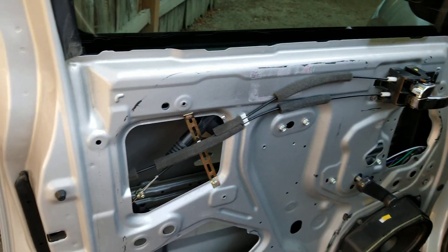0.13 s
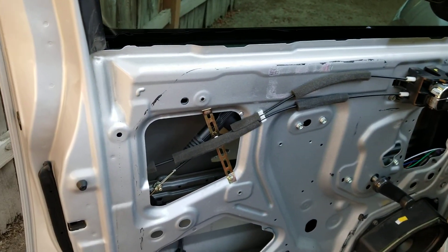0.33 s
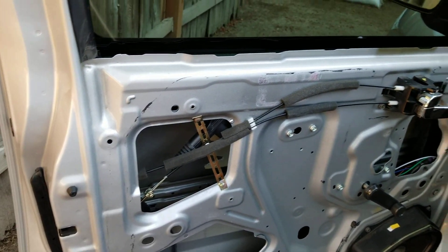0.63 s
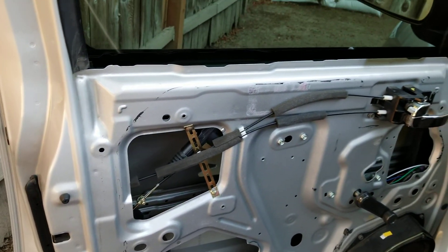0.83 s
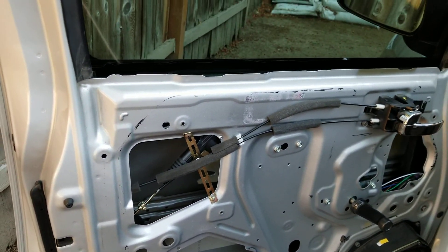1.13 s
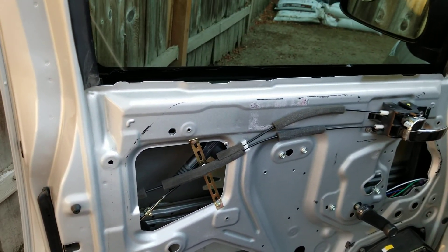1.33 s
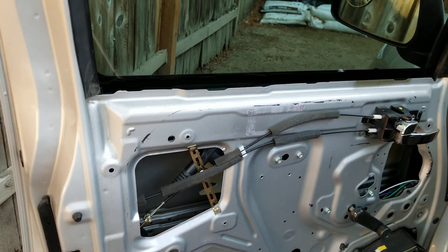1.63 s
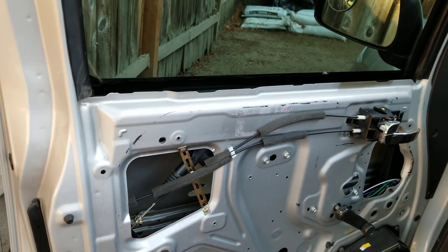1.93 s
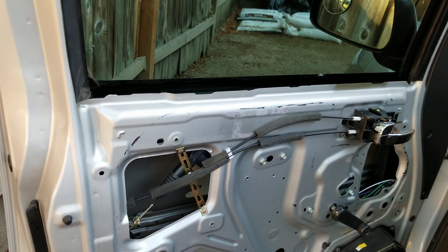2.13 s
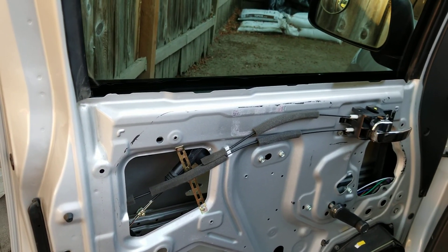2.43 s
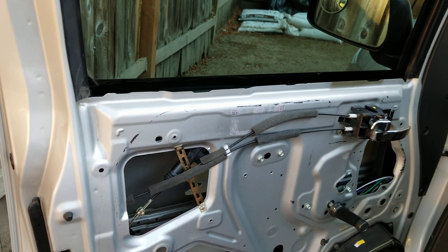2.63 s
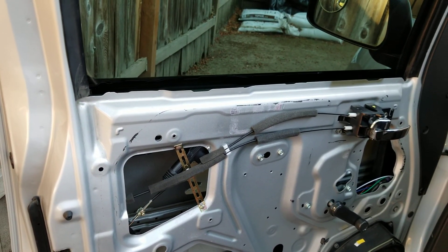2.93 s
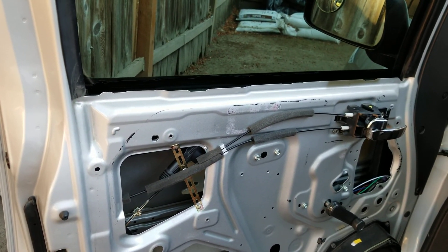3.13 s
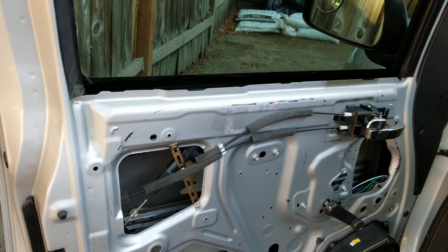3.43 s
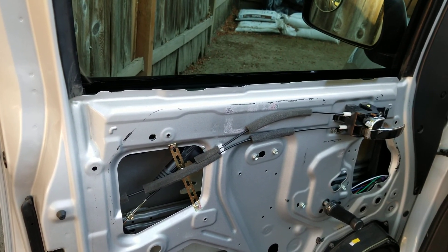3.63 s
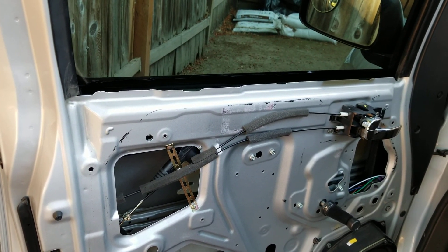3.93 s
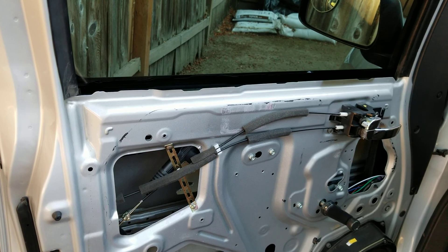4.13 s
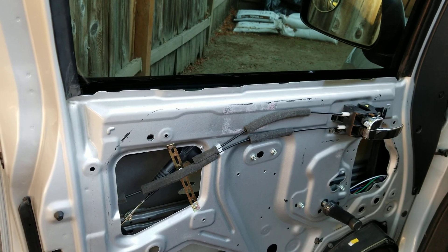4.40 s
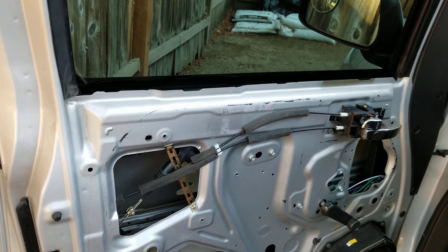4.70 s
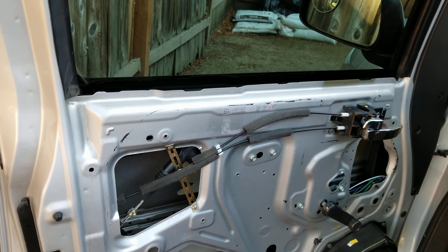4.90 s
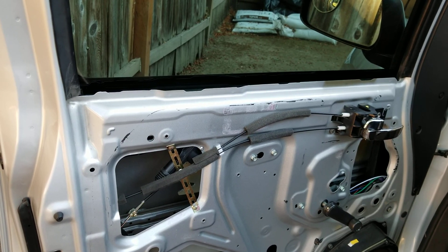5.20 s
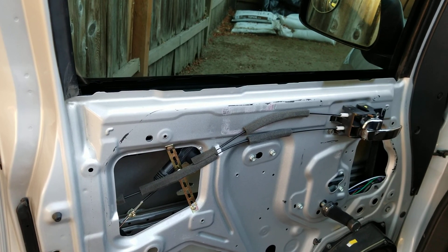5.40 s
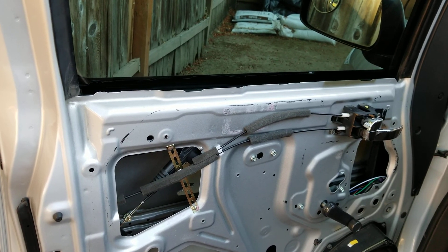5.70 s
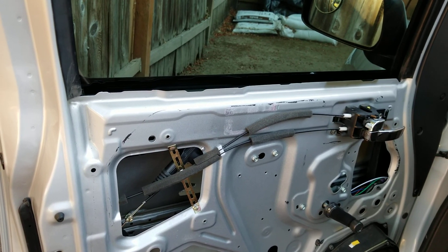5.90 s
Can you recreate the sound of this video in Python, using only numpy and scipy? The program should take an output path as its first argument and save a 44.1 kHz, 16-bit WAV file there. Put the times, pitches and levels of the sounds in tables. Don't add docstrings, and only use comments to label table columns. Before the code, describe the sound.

In a fenced yard, a close stereo microphone catches an electric door lock working in an open sheet-metal panel. After a second of low traffic rumble comes a tick and muffled stall knock. Lock and unlock strokes then alternate, each a sharp double metallic clack with short panel resonance, announced by a plastic tick and answered by a quieter, duller return. Faint birds and high insects stay behind.

```python
import sys
import numpy as np
from scipy import signal
from scipy.fft import rfft, irfft
from scipy.io import wavfile

SR = 44100
rng = np.random.default_rng(int(sys.argv[2]) if len(sys.argv) > 2 else 0)


def store_wav(level_fs):
    pcm = np.round(np.clip(np.atleast_2d(level_fs), -1, 1) * 32767)
    wavfile.write(sys.argv[1], SR, pcm.T.astype(np.int16))


def nominal_scale(level):
    x = np.asarray(level, float) / 20
    return 10 ** x


N = 266893

# [t/s, strength/dB]
LOCK_BLOWS = [
    (2.385, 0.5),
    (4.502, 0),
]
UNLOCK_BLOWS = [
    (3.455, 0.3),
    (5.553, 0.52),
]
LOCK_RETURN_BLOWS = [
    (2.787, 0.081),
    (4.906, 0.51),
]
UNLOCK_RETURN_BLOWS = [
    (1.702, 1.5),
    (3.856, 1.56),
    (5.955, 0.18),
]
STALL_BLOWS = [
    (1.272, -.6),
]
# panel thump/dB, brightness/dB, door sway of the blows/dB
LOCK_RUN, LOCK_COLOUR = (-.0405, .0005, -39, -20), (1, 3, 7)
UNLOCK_RUN, UNLOCK_COLOUR = (-.0375, .002, -37, -25.5), (.5, 4.5, 4)
LOCK_RETURN_RUN, LOCK_RETURN_COLOUR = (-.018, .018, -44, -38.5), (5, 1, 0)
UNLOCK_RETURN_RUN, UNLOCK_RETURN_COLOUR = (-.015, .008, -47, -40), (1, -1.5, -3)
STALL_RUN, STALL_COLOUR = (-.006, .0005, -29, -31.5), (4, 4, 15)
# [t/s from the main blow, level/dB, panel thump/dB, latch ring/dB, brightness/dB]
LOCK_HITS = [
    (-.0055, -36.5, 6, 3, -3.5),
    (0, -21.5, -4.5, 9, 0.5),
    (.01, -29.5, -3.5, 1.5, -6),
    (.014, -21, 2, -0.5, -13.5),
    (.025, -28, -2, -3, -12),
]
UNLOCK_HITS = [
    (0, -25, -16, 7.56, 8.5),
    (0.0126, -22.5, 2, 3.3, 1),
    (.022, -37, 3, 6.1, -14),
    (.033, -43, 5, 0.076, 0),
]
LOCK_RETURN_HITS = [
    (0, -35.5, 7, -5.5, 3),
    (.005, -38, 3, -18, -13.5),
    (.016, -47, 12, -6, 7.5),
    (.022, -41.5, 5, 1, -1),
    (.037, -50, -13, 3, -18),
]
UNLOCK_RETURN_HITS = [
    (0, -39.5, 2.7, -15, -1),
    (.007, -42.5, 4.2, 2, -15),
    (0.0134, -45, 3, -13, -19),
]
STALL_HITS = [
    (0, -48, 3.3, 5, 21),
    (0.012, -35, 5.1, -1, -15),
    (.04, -43.5, 6.4, -7, -11),
    (0.075, -50, 6.3, -3, -8),
    (.104, -56, 13, 2, -10),
    (.132, -52.5, 12, -2, -9),
]
STROKE_KINDS = [(LOCK_BLOWS, LOCK_RUN, LOCK_COLOUR, LOCK_HITS),
                (UNLOCK_BLOWS, UNLOCK_RUN, UNLOCK_COLOUR, UNLOCK_HITS),
                (LOCK_RETURN_BLOWS, LOCK_RETURN_RUN, LOCK_RETURN_COLOUR, LOCK_RETURN_HITS),
                (UNLOCK_RETURN_BLOWS, UNLOCK_RETURN_RUN, UNLOCK_RETURN_COLOUR, UNLOCK_RETURN_HITS),
                (STALL_BLOWS, STALL_RUN, STALL_COLOUR, STALL_HITS)]
# [start t/s, end t/s, start level/dB,
# end level/dB, brightness/dB]
LOOSE_RATTLES = [
    (0.878, 0.914, -79, -74, 12.5),
    (1.334, 1.438, -59.5, -69, 7.5),
]
RUB_THUMP_DB, TOUCH_SPREAD_DB = -16, 1.5
SETTLE_DB_PER_S, BRIGHT_SETTLE_DB_PER_S = 880, 1151
# [f/Hz, level/dB per Hz]
DOOR_SPECTRUM = [(36, -44.5), (60, -7.5), (120, -4), (230, -3), (420, -9.5), (600, -11), (900, -7.5),
                 (1500, -15), (2200, -15), (6500, -24), (9000, -34.5), (13500, -30), (15850, -34.5),
                 (16250, -61.5)]
# [f/Hz, T60/s]
DOOR_DECAY = [(50, 0.18), (120, 0.49), (300, 0.28), (800, 0.17), (2000, 0.12), (6000, 0.1), (15000, 0.016)]
# [f/Hz, level/dB, T60/s]
PANEL_MODES = [(54.93, -16, 0.51), (91, -14, 0.47), (126, -19.5, 0.38), (164.8, -8.5, 0.15),
               (202, -21, .12), (271.7, -15.5, 0.2), (367, -14.5, 0.14), (421, -10.5, 0.074),
               (510, -22, 0.022), (714, -21.5, 0.041), (749, -13, 0.21), (917.4, -5.5, 0.057),
               (1045, -26, 0.15), (1280, -20, 0.05), (1406, -8.5, 0.078), (1530, -5, 0.079),
               (1710, -16, 0.077), (1771, -21.5, 0.026), (2420, -27.5, 0.087), (2496, -20, .1)]
# [f/Hz, left over right/dB]
DOOR_BALANCE = [(60, -0.5), (120, 0.5), (240, 3), (480, 3.5), (950, 5.5), (1890, 5.5), (3770, 5.5),
                (7520, 13.5), (15000, 12)]
# [f/Hz, left-right likeness/1]
DOOR_LIKENESS = [(60, 0.92), (250, 1), (1000, 0.29), (2500, 0.064), (6000, 0.3), (15000, 0.092)]
DOOR_TOP_HZ = 16250
# [t/s, level/dB, rebound/dB, tail/dB, pan/dB]
SWITCH_TICKS = [
    (1.1239, -29, -16.5, -7, 1),
    (2.203, -32.5, -3, -6, 7),
    (3.2745, -32, -16, -2, 3.5),
    (4.32, -32.5, -13.5, -4, 2),
    (5.3727, -35, -4, 2, 6.5),
]
# [f/Hz, level/dB per Hz]
TICK_SPECTRUM = [(410, -43), (700, -5), (1900, -7), (2660, -11), (3250, -10), (3810, -2.5), (5040, -7),
                 (6850, -10), (7620, -1), (8590, -18), (9560, -21.5), (10100, -9), (11200, -11.5),
                 (15300, -2.5), (17000, -7)]
# [t/s, f/Hz, level/dB, T60/s]
SPRING_TWANGS = [
    (3.456, 2503, -53.5, 0.56),
    (3.855, 3600, -68.5, 0.8),
    (3.858, 4740, -66, 0.82),
    (3.856, 5020, -66, 1.1),
    (3.859, 6820, -69.5, 0.78),
    (5.554, 2570, -56, 0.61),
    (1.703, 1530, -41, 0.18),
]
TWANG_WIDTH_HZ = 130
YARD_T60_S, YARD_DB = 0.34, -22.5
# [t/s, level/dB]
ROAD_LEVEL = [(0.0, -52.5), (0.3, -52), (1.45, -52), (1.92, -55), (2.49, -52.5), (3.22, -55), (3.54, -53.5),
              (4.31, -55.5), (4.73, -50.5), (4.99, -50), (5.09, -54), (6.05, -56.5)]
# [f/Hz, level/dB per Hz]
RUMBLE_SPECTRUM = [(15, -64.5), (25, -24), (39, -10.5), (59, -3.5), (76, -2.5), (92, 3), (125, -4.5),
                   (156, -23.5), (198, -12), (250, -28.5), (320, -50.5), (550, -120)]
# [f/Hz, level/dB per Hz]
TRAFFIC_SPECTRUM = [(88, -45), (150, -3.5), (220, -9.5), (255, -1), (349, -4), (753, -11.5), (872, -5),
                    (1190, -15), (1630, -27.5), (2220, -20.5), (2670, -26.5), (5760, -33.5), (6550, -24.5),
                    (9110, -40), (12000, -29), (15600, -54.5), (22000, -120)]
TRAFFIC_UNDER_DB, TRAFFIC_FOLLOWS, TRAFFIC_FADE_DB_PER_S = -10, 0.69, -0.59
# [t/s, f/Hz, level/dB]
WHINE_TRACK = [
    (0, 467, -85),
    (.15, 460, -68),
    (.4, 412, -73.5),
    (0.749, 385, -63.5),
    (1.1, 394.4, -74.5),
    (1.6, 380, -90),
    (6.05, 370, -110),
]
# [f/Hz, left over right/dB]
AIR_BALANCE = [(60, 2.5), (130, 4.5), (290, 10), (640, 5.0), (1410, 8.5), (3100, -2), (6820, 13),
               (15000, 7.5)]
# [f/Hz, left-right likeness/1]
AIR_LIKENESS = [(60, 0.98), (180, 0.99), (550, 1), (1650, -0.46), (4970, 0.39), (15000, 0.04)]
# [f/Hz, level/dB per Hz]
CHORUS_SPECTRUM = [(9000, -40), (10500, -10.5), (12500, 1), (14000, -0.5), (15700, 4.5), (15950, -39),
                   (16500, -70.5)]
# [t/s, length/s]
SINGER_PAUSES = [(0.122, .06), (0.696, 0.091), (1.324, 0.059), (2.037, 0.11), (2.714, .09), (3.557, .06),
                 (4.02, 0.11), (4.679, .06), (5.278, .09), (5.884, 0.18)]
TRILL_HZ, STROKE_HZ, STROKE_BEND_HZ = 30.2, 13950, 450
SINGER_DB, PAUSE_DB, CHORUS_DB = -69.5, -10, -80.5
# [t/s, length/s, start f/Hz, top f/Hz, level/dB]
BIRD_CHIPS = [
    (0.461, 0.064, 6930, 7400, -72),
    (.498, 0.072, 7300, 7550, -72),
    (2.53, 0.045, 6900, 7600, -72),
    (3.104, 0.044, 7100, 7700, -58),
    (3.388, 0.025, 6900, 7500, -71),
    (5.42, 0.047, 7080, 7750, -69.5),
    (5.462, 0.035, 6800, 7250, -73.5),
    (5.489, 0.02, 7500, 7750, -75),
    (5.662, 0.032, 6900, 7250, -63),
]
CUTOFF_HZ = 17400


def lever():
    drive = np.zeros((5, N))
    for blows, run, colour, touches in STROKE_KINDS:
        for s, strength_db in blows:
            for later, level_db, thump_db, ring_db, bright_db in touches:
                parts_db = np.array([colour[2], thump_db, 0, ring_db, bright_db])
                parts_db = parts_db + TOUCH_SPREAD_DB * rng.standard_normal(5)
                drive[:, round((s + later) * SR)] = nominal_scale(strength_db + level_db + 24.0 + parts_db)
    return through_door(drive)


def gears():
    sizes = nominal_scale(3.6 * np.minimum(rng.exponential(1, N), 4)) * rng.choice([-1, 1], N)
    teeth = rms_one(sizes * (rng.random(N) < 3000 / SR))
    runs = []
    for blows, run, colour, touches in STROKE_KINDS:
        for s, db in blows:
            runs.append((s + run[0], s + run[1], db + run[2], db + run[3], *colour[:2]))
    for rub in LOOSE_RATTLES:
        runs.append((*rub[:4], RUB_THUMP_DB, rub[4]))
    drive, t = np.zeros((5, N + SR)), np.arange(SR // 4) / SR
    settle = np.array([[SETTLE_DB_PER_S]] * 4 + [[BRIGHT_SETTLE_DB_PER_S]])
    for start, end, start_db, end_db, thump_db, bright_db in runs:
        effort_db = np.interp(t, [0, end - start], [start_db, end_db])
        effort_db = effort_db - settle * np.maximum(t + start - end, 0)
        spin_up = np.clip(t / 0.016, 0, 1)
        colour = nominal_scale([[thump_db - 1.5], [thump_db], [0], [0], [bright_db]])
        drive[:, round(start * SR):][:, :len(t)] += spin_up * nominal_scale(effort_db) * colour
    return through_door(drive[:, :N] * teeth)


def through_door(drive):
    sound = sum(convolve(part, response) for part, response in zip(drive, door_response()))
    return signal.sosfilt(signal.cheby2(14, 50, DOOR_TOP_HZ, fs=SR, output="sos"), sound)


def door_response():
    t = np.arange(SR * 3 // 4) / SR
    parts = np.zeros((5, 2, len(t)))
    edges_hz = [135, 450, 1150, 2400]
    for hz, noise in bands(SR, DOOR_SPECTRUM, DOOR_LIKENESS, DOOR_BALANCE):
        t60 = at_hz(DOOR_DECAY, hz)
        dying = nominal_scale(-60 * t / t60) * (1 - np.exp(-t * hz / 0.9)) / np.sqrt(t60)
        dying *= 1 + nominal_scale(1.5 - 60 * t / .02) * (hz > edges_hz[1])
        parts[np.searchsorted(edges_hz, hz)] += noise[:, :len(t)] * dying
    parts /= np.sqrt(np.sum(parts.sum(0) ** 2) / 2)
    for hz, level_db, t60 in PANEL_MODES:
        build_up = 1 - np.exp(-t * hz ** 2 / 83.0)
        mode = np.sin(2 * np.pi * hz * t) * nominal_scale(-60 * t / t60) * build_up
        sides = nominal_scale(level_db - 25.5 + at_hz(DOOR_BALANCE, hz) * np.array([[.5], [-.5]]))
        parts[np.searchsorted(edges_hz, hz)] += sides * mode
    return parts


def switch():
    out, t = np.zeros((2, N + 4096)), np.arange(4096) / SR
    freq = np.maximum(np.arange(2049) * SR / 4096, 1)
    cepstrum = irfft(np.log(nominal_scale(at_hz(TICK_SPECTRUM, freq))))
    cepstrum[1:2048] *= 2
    cepstrum[2049:] = 0
    snap = irfft(np.exp(rfft(cepstrum)))
    snap /= np.abs(snap).max()
    for s, level_db, rebound_db, tail_db, pan_db in SWITCH_TICKS:
        pan = [(100, pan_db), (9000, pan_db)]
        rattle = rms_one(sum(n for hz, n in bands(4096, TICK_SPECTRUM, DOOR_LIKENESS, pan)))
        rattle *= nominal_scale(-1.5 - 60 * t / 0.007) + nominal_scale(tail_db - 12 - 60 * t / 0.07)
        rebound = nominal_scale(rebound_db) * np.roll(snap, round(SR / 357))
        snaps = (snap + rebound) * nominal_scale([[pan_db / 2], [-pan_db / 2]])
        start = round(s * SR)
        out[:, start:start + 4096] += nominal_scale(level_db + 0.8) * (snaps + rattle)
    return out[:, :N]


def spring():
    out, t = np.zeros((2, N + SR)), np.arange(SR) / SR
    smooth = signal.butter(1, TWANG_WIDTH_HZ, fs=SR, output="sos")
    for s, hz, level_db, t60 in SPRING_TWANGS:
        tremble = rms_one(signal.sosfilt(smooth, rng.standard_normal((2, SR))))
        ring = tremble * np.sin(2 * np.pi * hz * t) * nominal_scale(level_db - 60 * t / t60)
        start = round(s * SR)
        out[:, start:start + SR] += ring * nominal_scale([[3], [-3]])
    return out[:, :N]


def yard(x):
    t = np.arange(SR // 2) / SR
    tail = rng.standard_normal((2, len(t))) * nominal_scale(-60 * t / YARD_T60_S) * (t > .008)
    tail = signal.lfilter([1], [1, -.3], tail)
    return convolve(x.mean(0), nominal_scale(YARD_DB) * tail / np.sqrt(np.sum(tail ** 2) / 2))


def insect():
    phase = 2 * np.pi * np.cumsum(TRILL_HZ * (1 + .02 * drift(3))) / SR
    stroke = np.clip(.5 * np.sin(phase) + .75, 0, 1) * nominal_scale(2 * drift(12))
    pitch_hz = STROKE_HZ + STROKE_BEND_HZ * np.sin(phase) + 150 * drift(8)
    rough = signal.sosfilt(signal.butter(2, 700, fs=SR, output="sos"), rng.standard_normal((2, N)))
    whistle = rms_one(rough) * np.sin(2 * np.pi * np.cumsum(pitch_hz) / SR) * nominal_scale([[4.5], [-4.5]])
    t = np.arange(N) / SR
    rest = sum(np.exp(-(2 * (t - s) / length) ** 4) for s, length in SINGER_PAUSES)
    singer = nominal_scale(SINGER_DB + PAUSE_DB * rest) * stroke * whistle
    return singer + nominal_scale(CHORUS_DB) * wash(CHORUS_SPECTRUM, patchy_db=1.4)


def birds():
    out, t = np.zeros(N + SR), np.arange(SR // 8) / SR
    for s, length, start_hz, top_hz, level_db in BIRD_CHIPS:
        pitch_hz = top_hz + (start_hz - top_hz) * np.exp(-t / .006) - 900 * t
        shape = np.clip(t / .01, 0, 1) ** 2 * np.clip((length - t) / 0.006, 0, 1)
        chip = nominal_scale(level_db) * shape * np.sin(2 * np.pi * np.cumsum(pitch_hz) / SR)
        out[round(s * SR):][:len(t)] += chip
    t = np.arange(SR // 2) / SR
    echoes = rng.standard_normal((2, len(t))) * nominal_scale(-37 - 60 * t / .6)
    return out[:N] * nominal_scale([[2], [-4]]) + convolve(out[:N], echoes)


def whine():
    s, hz, level_db = np.transpose(WHINE_TRACK)
    t = np.arange(N) / SR
    pitch_hz = np.interp(t, s, hz) + 2.7 * drift(8.1)
    level = nominal_scale(np.interp(t, s, level_db) + 4.0 * drift(7))
    return level * np.sin(2 * np.pi * np.cumsum(pitch_hz) / SR) * nominal_scale([[3], [-3]])


def traffic():
    t = np.arange(N) / SR
    road_db = np.interp(t, *np.transpose(ROAD_LEVEL))
    mean_db = road_db.mean()
    wash_db = mean_db + TRAFFIC_UNDER_DB + TRAFFIC_FOLLOWS * (road_db - mean_db) + TRAFFIC_FADE_DB_PER_S * t
    rumble = nominal_scale(road_db + 1.58) * wash(RUMBLE_SPECTRUM, patchy_db=2.57)
    return rumble + nominal_scale(wash_db) * wash(TRAFFIC_SPECTRUM, patchy_db=0.9)


def wash(spectrum, patchy_db):
    noises = bands(2 ** 12 * 66, spectrum, AIR_LIKENESS, AIR_BALANCE)
    out = sum(n[:, :N] * nominal_scale(patchy_db * drift(2.8)) for hz, n in noises)
    return out / np.sqrt(np.mean(out.mean(0) ** 2))


def bands(size, spectrum, alike, pan):
    white = rfft(rng.standard_normal((2, size)))
    freq = np.maximum(np.arange(white.shape[1]) * SR / size, 1)
    like = np.clip(at_hz(alike, freq), 0, 1)
    mid = np.sqrt(1 + like) * white[0]
    side = np.sqrt(1 - like) * white[1]
    pair = (mid + side * [[1], [-1]]) * nominal_scale(at_hz(pan, freq) * [[.5], [-.5]])
    pair = pair * nominal_scale(at_hz(spectrum, freq))
    for hz in 25 * 2 ** np.arange(0, 9.6, .5):
        share = np.cos(np.pi / 2 * np.clip(2 * np.log2(freq / hz), -1, 1)) ** 2
        if spectrum[0][0] <= hz * 1.4 and hz <= spectrum[-1][0] * 1.4:
            yield hz, irfft(pair * share, size)


def drift(rate_hz):
    r = np.exp(-80 * np.pi * rate_hz / SR)
    slow = signal.lfilter([1], [1, -2 * r, r * r], rng.standard_normal(N // 40 + 2002))[2000:]
    return np.interp(np.arange(N) / 40, np.arange(len(slow)), rms_one(slow))


def at_hz(points, hz):
    return np.interp(np.log(hz), np.log(np.array(points)[:, 0]), np.array(points)[:, 1])


def rms_one(x):
    return x / np.sqrt(np.mean(x ** 2) + 1e-20)


def convolve(x, response):
    return signal.fftconvolve(np.atleast_2d(x), response, axes=1)[:, :N]


def scene():
    near = lever() + gears() + switch() + spring()
    return near + yard(near) + insect() + birds() + whine() + traffic()


def top_cut(x):
    return signal.sosfilt(signal.butter(12, 17120, fs=SR, output="sos"), x)


def record(dry):
    mix = signal.sosfilt(signal.cheby2(12, 70, CUTOFF_HZ, fs=SR, output="sos"), dry)
    return top_cut(mix)


dry = scene()
out = record(dry)
store_wav(out)
```